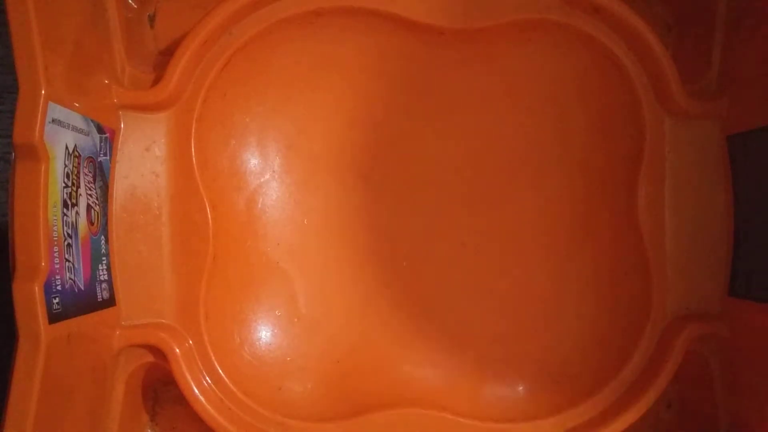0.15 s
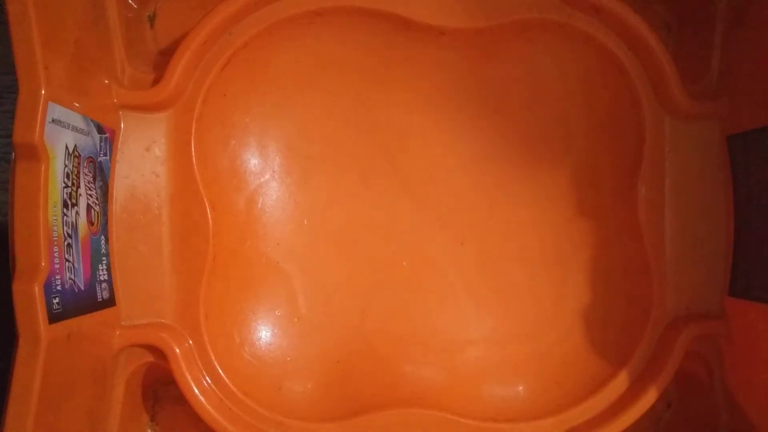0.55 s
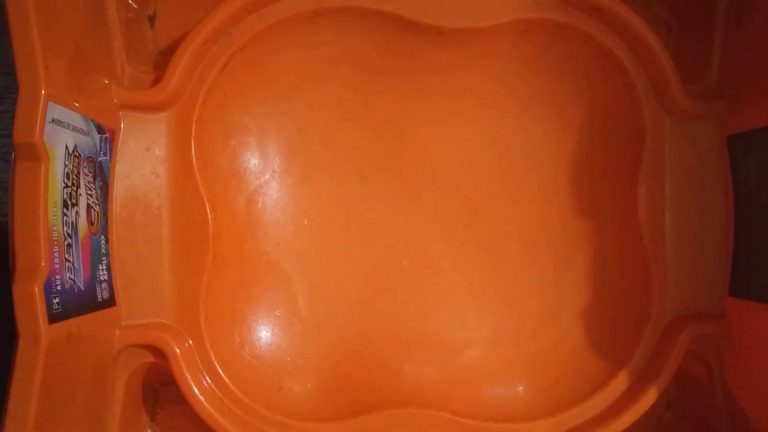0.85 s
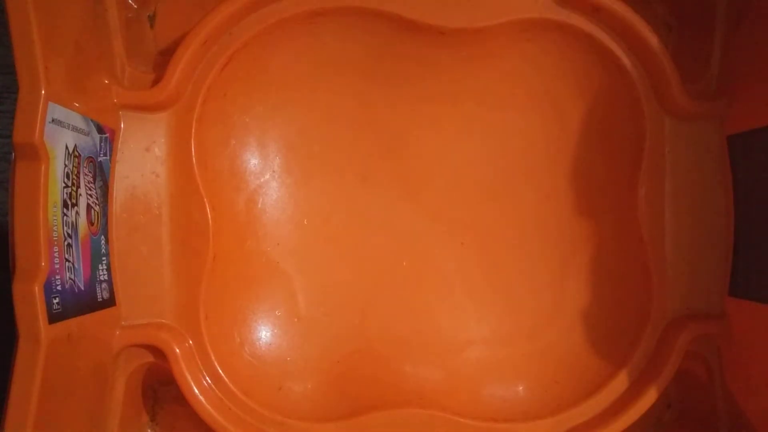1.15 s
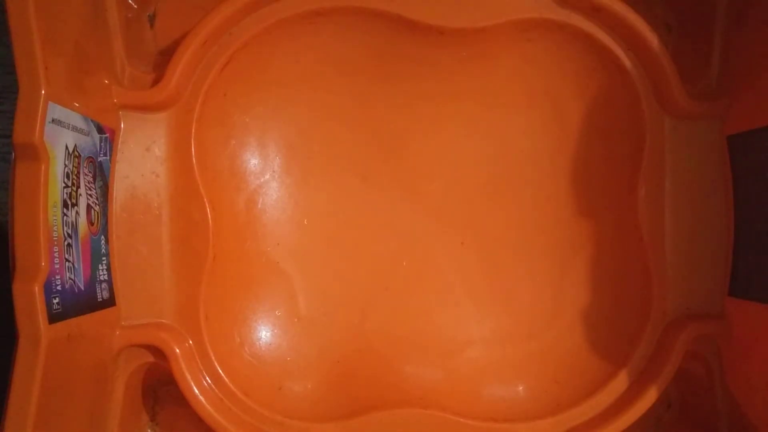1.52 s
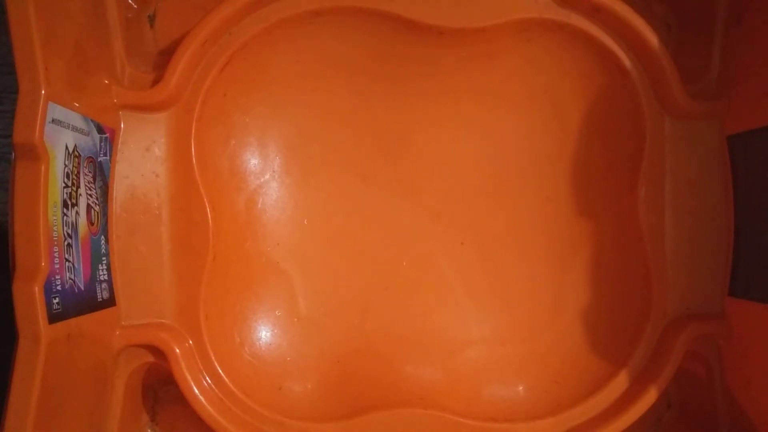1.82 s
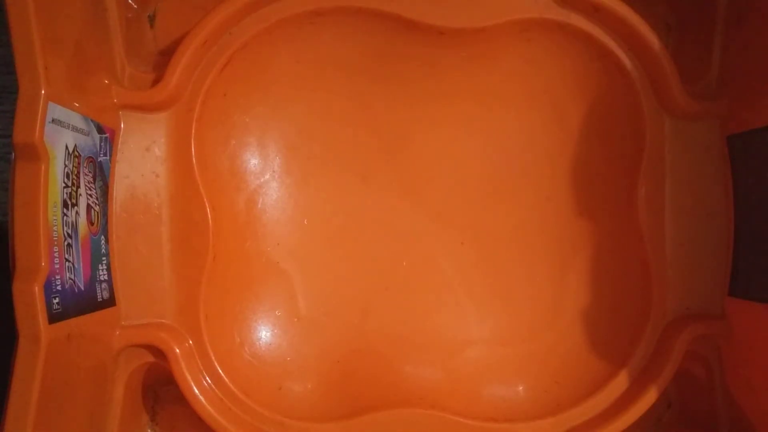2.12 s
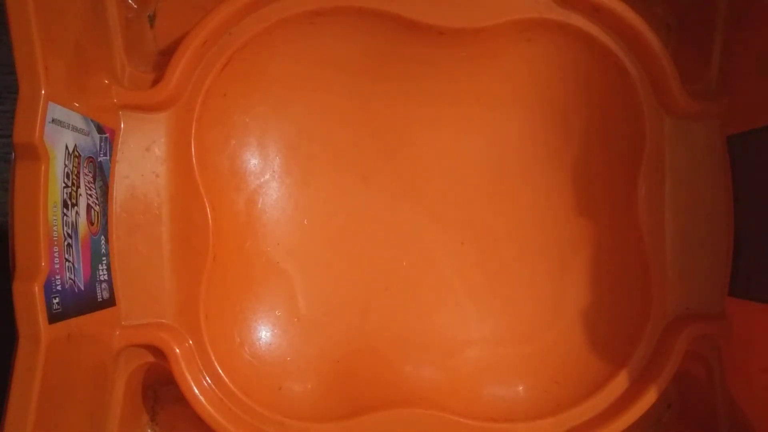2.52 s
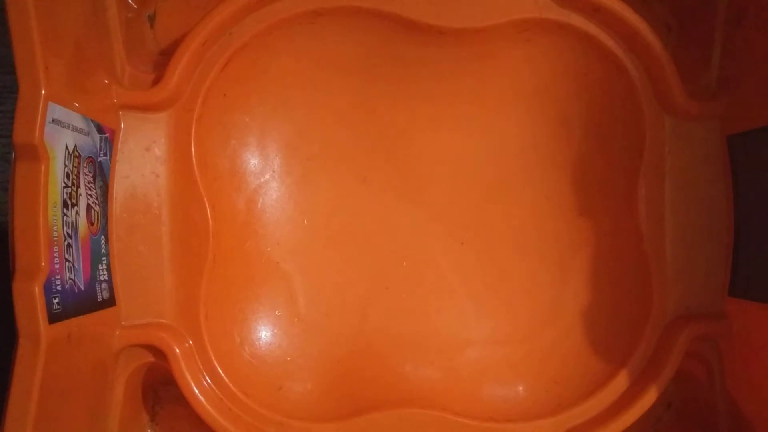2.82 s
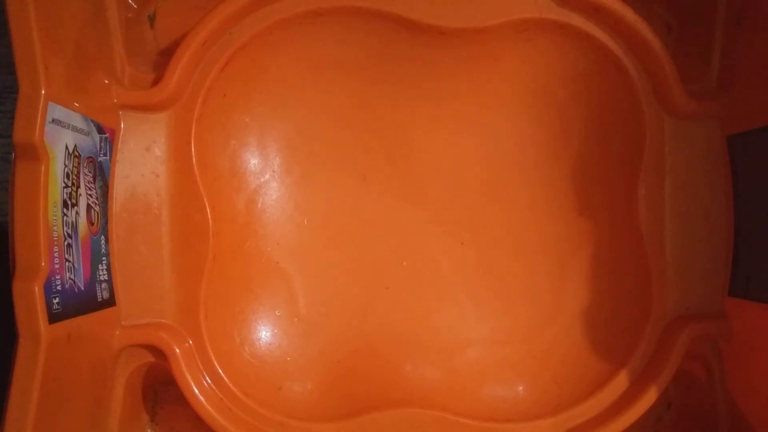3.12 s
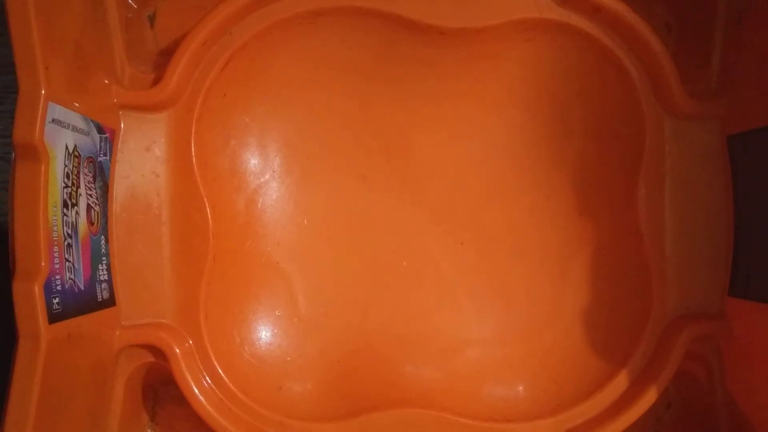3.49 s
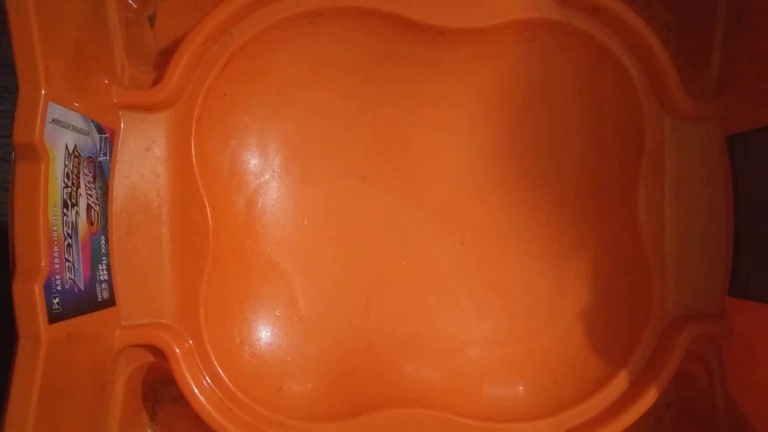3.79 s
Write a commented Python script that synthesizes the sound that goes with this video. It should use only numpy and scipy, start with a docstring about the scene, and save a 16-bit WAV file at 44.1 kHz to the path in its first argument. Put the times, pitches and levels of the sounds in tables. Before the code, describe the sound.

Plastic toy parts click sharply and twist with short ratcheting rasps over faint room hum

```python
"""A quiet room hums and hisses; then hard plastic tops and launchers are fitted together close by.
Floor: shaped noise, narrow hum bands and a mains tone. Scrapes, snaps and twists: enveloped
grainy noise shakes the shells zone by zone and rings their modes, with a short room tail.
Loose parts and table thuds: single wavering tones. The recorder cuts the top."""
import sys
import numpy as np
from scipy import signal
from scipy.fft import rfft, irfft
from scipy.io import wavfile
from scipy.ndimage import uniform_filter1d

SR = 44100
rng = np.random.default_rng(int(sys.argv[2]) if len(sys.argv) > 2 else 0)


def file_out(sig):
    """Save sig as 16-bit WAV at sys.argv[1]."""
    # one column per channel
    cols = np.atleast_2d(sig).T
    # limit, then scale
    lim = np.clip(cols, -1, 1)
    pcm = np.round(lim * 32767).astype(np.int16)
    wavfile.write(sys.argv[1], SR, pcm)


N = 174195  # samples

# frequency zones of the shells that a contact shakes: low_hz, high_hz
ZONES = [(250, 800), (850, 1580), (1760, 2950), (3100, 4250), (4300, 6900), (7000, 11600), (11700, 16500)]

FLOOR_DB, RUMBLE_CUT_HZ = -67.5, 30
MAINS_HZ, MAINS_DB = 58.8, -72.5
GRAIN_DB, GRAINS_PER_S = 3, 300  # contact unevenness, standard deviation before smoothing
MODE_SPREAD_DB, MODE_DETUNE = 3.5, .015  # spread of mode gain and relative pitch from burst to burst
NARROWEST_HZ = 40  # plastic damps every mode at least this much
BURST_SAMPLES = 2 ** 15
BURST_DB = -10.5  # burst rms relative to its tabled peak level
LEAD_S = .004  # contact begins this long before the snap is heard
TWIST_START_DB, TWIST_ROUND = -40, 1.19  # start relative to peak; exponent easing into the peak
RING_ROUGH, RING_WAVER = 0.33, 0.064  # waver depth; waver speed as a share of the pitch
ROOM_T60_S, ROOM_DB = 0.28, -7.5
TOP_HZ = 15850


def undb(db):
    """Amplitude ratio of a dB value."""
    return 10 ** (np.asarray(db) / 20)


def level(x, db):
    """Scale a signal to an rms in dB."""
    return x * undb(db) / np.sqrt(np.mean(x ** 2))


def curve(table, hz):
    """Gain of a (hz, db) table, interpolated on a log frequency axis."""
    points = np.array(table, float)
    return undb(np.interp(np.log(hz + 1), np.log(points[:, 0]), points[:, 1]))


def mode(f, hz, width_hz):
    """Complex response of one damped resonance."""
    return 1 / (1 + 2j * (f - hz) / width_hz)


def swell(t, rise_s, hold_s, t60_s):
    """Smooth rise from t = 0, hold, exponential fall."""
    rise_s = max(rise_s, .001)
    rise = np.sin(np.pi / 2 * np.clip(t / rise_s, 0, 1)) ** 2
    fall_s = np.clip(t - rise_s - hold_s, 0, 9)
    return rise * undb(-60 * fall_s / max(t60_s, .01))


def shaped_noise(response):
    """White noise filtered by a frequency response."""
    return irfft(rfft(rng.standard_normal(N)) * response, N)


def floor():
    """Room rumble and microphone hiss as shaped noise, a mains sine, resonant noise bands of hum."""
    # noise spectrum: hz, relative_db (per Hz)
    spectrum = [(15, -64.5), (25, -18.5), (43, -10), (104, -2.5), (123, -6), (144, -13.5), (179, -10.5),
                (235, -16.5), (498, -16), (1000, -22.5), (1540, -27), (2440, -33), (15700, -39.5)]
    # wavering hum: center_hz, width_hz (of each of two equal resonances in series), rms_db
    hum_bands = [(110, 41, -70.5), (176.4, 3.3, -77.5), (219, 8.5, -79), (771.7, 80, -80)]
    f = np.arange(N // 2 + 1) * SR / N
    rumble_cut = f ** 2 / (f ** 2 + RUMBLE_CUT_HZ ** 2)
    hiss = level(shaped_noise(curve(spectrum, f) * rumble_cut), FLOOR_DB)
    mains = np.sqrt(2) * undb(MAINS_DB) * np.sin(2 * np.pi * MAINS_HZ * np.arange(N) / SR)
    hum = sum(level(shaped_noise(mode(f, hz, width_hz) ** 2), db) for hz, width_hz, db in hum_bands)
    return hiss + mains + hum


def grainy_contact():
    """Rubbing surfaces: noise of smoothly varying strength, with its own grain in each zone."""
    grain_samples = int(SR / GRAINS_PER_S)
    steps = rng.standard_normal((len(ZONES), N // grain_samples + 1))
    steps = np.repeat(steps, grain_samples, axis=1)[:, :N]
    grain = undb(GRAIN_DB * uniform_filter1d(steps, grain_samples // 2))
    contact = level(grain * rng.standard_normal(N), 0)
    return np.pad(contact, ((0, 0), (0, BURST_SAMPLES)))


def shell_response(f):
    """Modes over a smooth background; mode strength and pitch vary a little at random per burst."""
    # shell modes: hz and gain_db (both before the random spread), width_hz (before the damping limit)
    # in the order hz, width_hz, gain_db
    modes = [(1167, 36, -18), (1622, 50, -4), (1928, 36, -3.5), (2179, 44, -2), (2650, 60, -8),
             (3287, 60, -11.5), (3620, 180, -0.5), (4450, 80, -14.5), (5400, 97, -18.5), (6250, 80, -31),
             (13900, 570, -24)]
    # response between the modes: hz, gain_db
    between = [(250, -28.5), (850, -20.5), (1500, -17.5), (2400, -2.5), (3000, -9.5), (3700, -17),
               (5000, -30.5), (7000, -40.5), (10000, -30.5), (14000, -39), (15800, -29.5)]
    response = curve(between, f)
    for (hz, width_hz, gain_db), (gain_dev, pitch_dev) in zip(modes, rng.standard_normal((len(modes), 2))):
        varied_hz = hz * (1 + MODE_DETUNE * pitch_dev)
        gain = undb(gain_db + MODE_SPREAD_DB * gain_dev)
        response = response + gain * mode(f, varied_hz, max(width_hz, NARROWEST_HZ))
    return response


def scrape_force(t, rise_s, t60_s):
    """A snap or short scrape rises smoothly and falls exponentially."""
    return swell(t, rise_s, 0, t60_s)


def twist_force(t, rise_s, t60_s):
    """A twisting rasp grows in dB to its peak, then falls exponentially."""
    growth_db = TWIST_START_DB * np.clip(1 - t / rise_s, 0, 1) ** TWIST_ROUND
    return swell(t, LEAD_S, rise_s - LEAD_S, t60_s) * undb(growth_db)


def shell_bursts():
    """Grainy contact bursts shake the zones of the shells; the modes ring on."""
    # snaps and short scrapes: time_s, peak_db, 7 x zone_db (relative to peak_db), rise_s, t60_s
    scrapes = [(0.565, -55, -29, -14, 4.5, -39, -29, -34, -25, 0.011, 0.24),
               (0.825, -47.5, -29.5, -32, -36, -6, -21.5, -26, -24, 0.0054, 0.33),
               (0.892, -40, -29.5, -20, -1, 4, -26, -30.5, -35, 0.02, 0.52),
               (0.926, -18, -36, -18.5, -4, -13.5, -20, -30, -38, 0.0092, 0.13),
               (0.948, -28, -48, -20.5, -10, -36, -29, -41.5, -41, 0.016, 0.12),
               (0.996, -30.5, -32.5, -37, -14.5, -5.5, -22.5, -35.5, -42, 0.0046, 0.16),
               (1.049, -43, -27, -47, -1.5, -8.5, -17, -39, -34, 0.0083, 0.19),
               (1.156, -51.5, -9, -13, 3, 0, -7.5, -34, -29.5, 0.0035, 0.31),
               (1.191, -19, -17.5, -15.5, -9, -10.5, -21.5, -41, -50, 0.0081, 0.19),
               (1.317, -36.5, -21, -41, -3.5, -5.5, -29, -37, -41, 0.0075, 0.21),
               (1.579, -40, -36, -32, -8, -21, -26, -36, -35, 0.0047, 0.16),
               (1.64, -39, -32, -26, -6, -16, -25.5, -42, -32, 0.0028, 0.16),
               (2.098, -56.5, -9, -11, -13, -0.5, -32, -23, -18.5, 0.0075, 0.14),
               (2.52, -32.5, -35, -47, -23.5, -14.5, -13, -23, -17.5, 0.008, 0.15),
               (2.709, -30.5, -47, -39.5, -5, -7, -12, -20.5, -19, 0.0098, 0.13),
               (2.732, -27.5, -58, -23.5, -11, -15, -16, -33, -30, 0.006, 0.3),
               (2.918, -37, -36, -45, -5, -10, -30, -41, -34, 0.007, 0.39),
               (2.982, -43.5, -36, -22, -4, -4.5, -13, -40, -42, 0.0038, 0.2),
               (3.017, -47, -22.5, -40, 4, -17, -8.5, -42, -36, 0.011, 0.25),
               (3.144, -33, -41, -32, -5, -7.5, -25, -36, -40, 0.0048, 0.14),
               (3.18, -49, -34, -31, -0.5, -5, -26, -31, -34, 0.0071, 0.23),
               (3.231, -36.5, -32.5, -38, -4.5, 3, -33, -45, -33, 0.0043, 0.075),
               (3.578, -49, -27, -23, -18, 4, -39, -25, -26, 0.0075, 0.15),
               (3.619, -44.5, -36, -20, -19, 5, -19, -31, -38.5, 0.0045, 0.09)]
    # rasps: peak_s, peak_db, 7 x zone_db (relative to peak_db), rise_s, t60_s
    twists = [(2.796, -28, -61, -40, -3, -5, -10.5, -24, -25, 0.092, 0.15),
              (3.046, -28.5, -48, -48, -6.5, 3, -8, -29.5, -20, 0.046, 0.1),
              (3.065, -27, -55, -39, -1, -8, -11.5, -24.5, -28, 0.033, 0.12),
              (3.286, -26.5, -34, -39, 1.5, 3.5, -9.5, -23, -21.5, 0.044, 0.16),
              (3.304, -22.5, -38, -15, -0.5, -1.5, -22.5, -21, -19.5, 0.041, 0.086),
              (3.652, -25.5, -48, -2, -12, 5.5, -17.5, -34, -33, 0.034, 0.18),
              (3.665, -20, -54, -12, -5, -34.5, -15.5, -27.5, -22.5, 0.034, 0.17)]
    f = np.arange(BURST_SAMPLES // 2 + 1) * SR / BURST_SAMPLES
    t = np.arange(BURST_SAMPLES) / SR
    filters = [signal.butter(4, zone, "band", fs=SR, output="sos") for zone in ZONES]
    bands = [signal.sosfreqz(sos, f, fs=SR)[1] for sos in filters]
    contact = grainy_contact()
    out = np.zeros(N + BURST_SAMPLES)
    bursts = [(s - LEAD_S, scrape_force, *row) for s, *row in scrapes]
    bursts += [(s - row[-2], twist_force, *row) for s, *row in twists]
    for start_s, force_shape, peak_db, *zones_db, rise_s, t60_s in bursts:
        i = int(start_s * SR)
        force = force_shape(t, rise_s, t60_s) * undb(peak_db + BURST_DB)
        rung = rfft(force * contact[:, i:i + BURST_SAMPLES]) * shell_response(f)
        # each zone receives its share of the energy of the burst
        spectrum = 0
        for zone_db, band, ring in zip(zones_db, bands, rung):
            zone = band * ring
            spectrum = spectrum + undb(zone_db) * zone / np.sqrt(np.mean(np.abs(zone) ** 2))
        out[i:i + BURST_SAMPLES] += irfft(spectrum * np.sqrt(np.sum(force ** 2)), BURST_SAMPLES)
    return out[:N]


def room(x):
    """Dense, short reverberation: convolution with decaying noise."""
    t = np.arange(SR // 2) / SR
    build_up = 1 - np.exp(-t / 0.002)
    tail = rng.standard_normal(len(t)) * undb(-60 * t / ROOM_T60_S) * build_up
    return signal.fftconvolve(x, tail * undb(ROOM_DB) / np.sqrt(np.sum(tail ** 2)))[:N]


def rings():
    """Loose parts and the table: single tones whose level and phase waver at random."""
    # lone rings and thuds: start_s, pitch_hz, level_db (sine rms before waver), rise_s, hold_s, t60_s
    tones = [(0.58, 4100, -75, 0.0058, 0.054, 0.16), (0.918, 394, -57.5, 0.0069, 0.011, 0.073),
             (0.692, 363, -66.5, 0.006, 0.0051, 0.046), (0.819, 3850, -59.5, 0.012, 0.0089, 0.33),
             (0.824, 2160, -58, 0.023, 0.041, .1), (0.892, 2155, -38, 0.014, 0.02, 0.057),
             (.927, 2160, -32.5, 0.0054, 0.02, 0.035), (0.94, 2100, -41.5, 0.0042, 0.01, 0.063),
             (0.993, 3680, -34.5, 0.0047, 0.0015, 0.032), (1.001, 3738, -42.5, 0.0029, 0.018, 0.046),
             (0.971, 330, -55, 0.0032, 0.0063, 0.11), (0.987, 110, -45, 0.0061, 0.011, 0.11),
             (1.04, 110, -45, 0.0023, 0.0031, 0.17), (1.195, 106, -40.5, 0.011, 0.0051, 0.23),
             (1.21, 130, -47.5, 0.0023, 0.0063, 0.27), (1.353, 748, -55, 0.003, 0.0079, 0.039),
             (1.578, 2070, -54, 0.0045, 0.048, 0.28), (1.634, 4200, -73, 0.0044, 0.019, .15),
             (1.634, 3640, -64.5, 0.0043, 0.032, 0.26), (1.042, 300, -63, 0.0069, .01, 0.056),
             (2.98, 4000, -50, 0.0029, 0.014, .15), (3.301, 13950, -43, .003, .003, .04),
             (2.732, 3950, -35.5, 0.0021, 0.0029, 0.025), (3.122, 105.3, -53, 0.0056, 0.038, 0.16),
             (3.617, 2630, -55, 0.011, 0.032, 0.11), (3.465, 342, -56.5, 0.004, 0.0042, 0.16)]
    t, out = np.arange(N) / SR, 0
    chance = rng.standard_normal((2, N))
    for start_s, hz, db, rise_s, hold_s, t60_s in tones:
        k = int(SR / (RING_WAVER * hz))
        waver = uniform_filter1d(uniform_filter1d(chance, k), k)
        log_gain, drift = RING_ROUGH * level(waver, 0)
        tone = np.exp(log_gain) * np.sin(2 * np.pi * hz * (t - start_s) + 2 * drift)
        out = out + np.sqrt(2) * undb(db) * swell(t - start_s, rise_s, hold_s, t60_s) * tone
    return out


def scene():
    """Room floor, shell bursts with their reverberation, and dry lone rings; one channel."""
    background = floor()
    toys = shell_bursts()
    return (background + toys + room(toys) + rings())[None]


def record(dry):
    """The recorder cuts the top with a steep elliptic low-pass."""
    return signal.sosfilt(signal.ellip(14, .2, 75, TOP_HZ, fs=SR, output="sos"), dry)


dry = scene()
out = record(dry)
file_out(out)
```